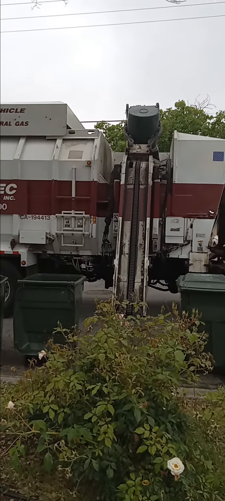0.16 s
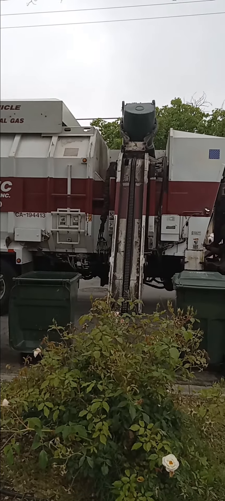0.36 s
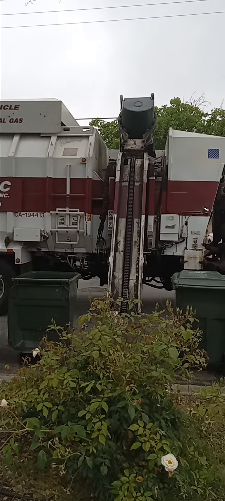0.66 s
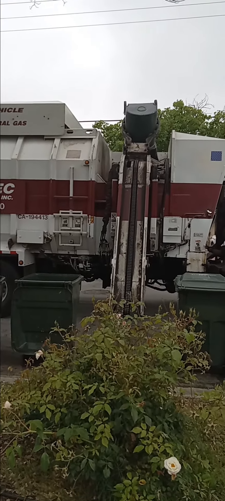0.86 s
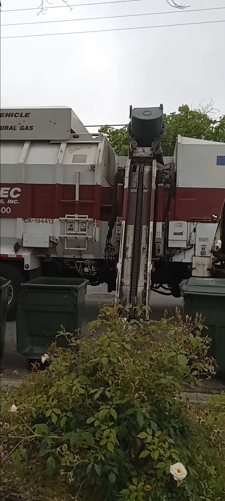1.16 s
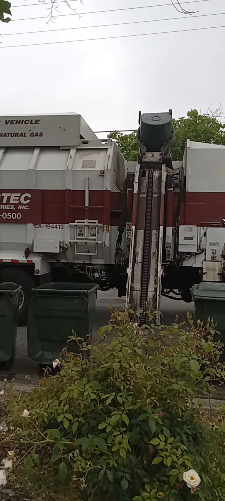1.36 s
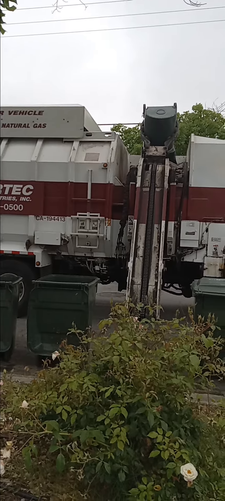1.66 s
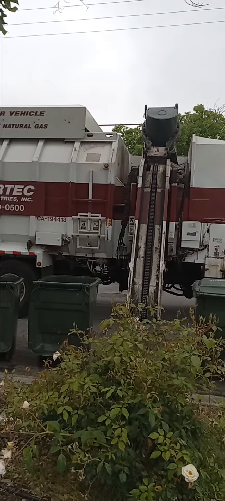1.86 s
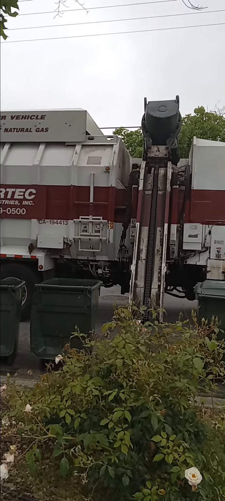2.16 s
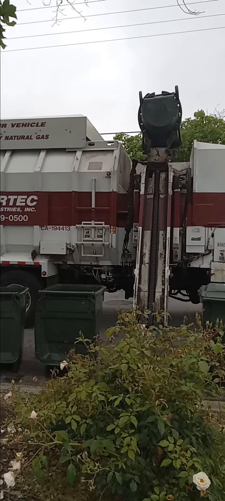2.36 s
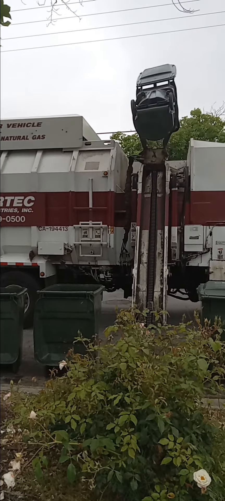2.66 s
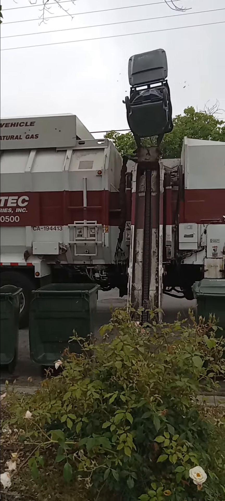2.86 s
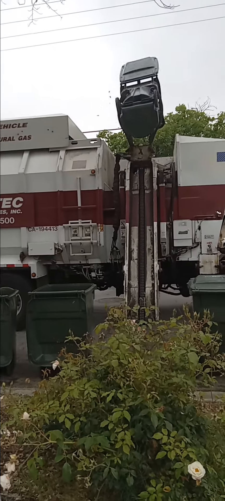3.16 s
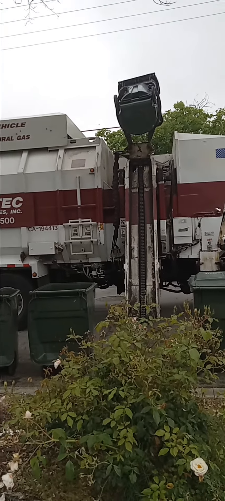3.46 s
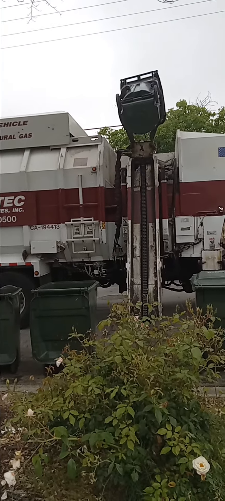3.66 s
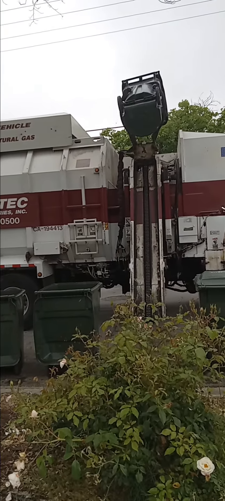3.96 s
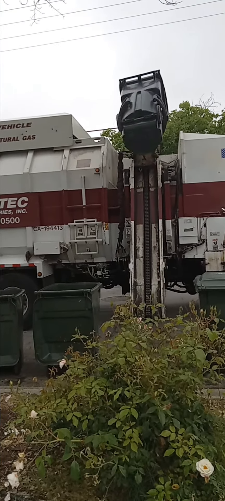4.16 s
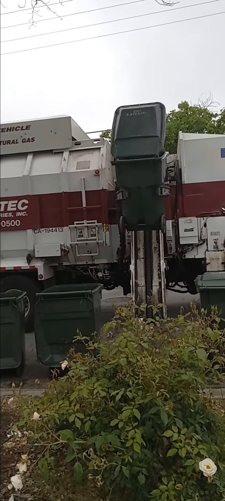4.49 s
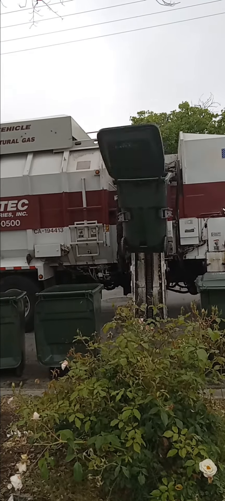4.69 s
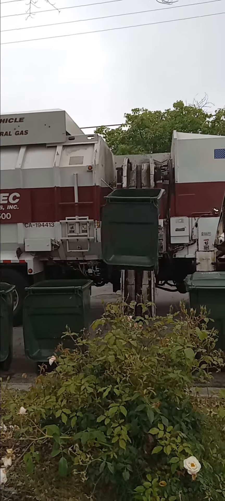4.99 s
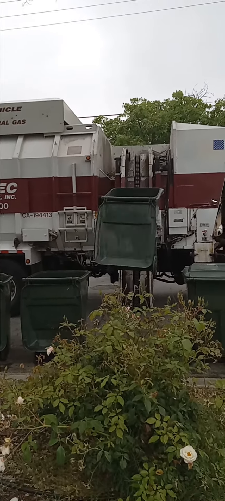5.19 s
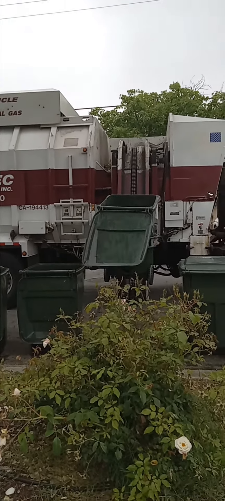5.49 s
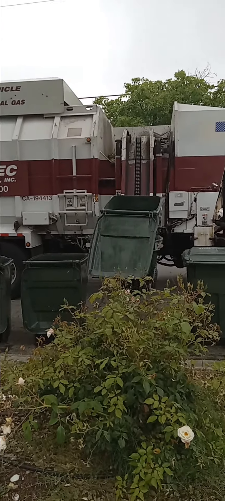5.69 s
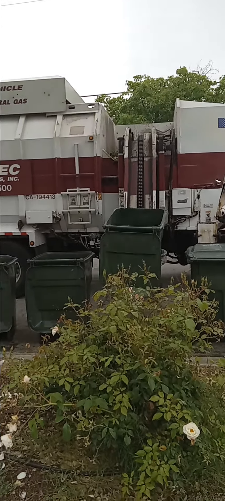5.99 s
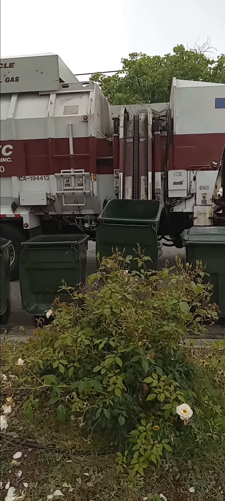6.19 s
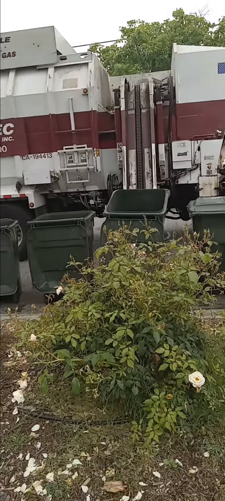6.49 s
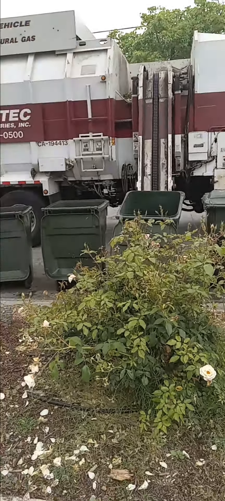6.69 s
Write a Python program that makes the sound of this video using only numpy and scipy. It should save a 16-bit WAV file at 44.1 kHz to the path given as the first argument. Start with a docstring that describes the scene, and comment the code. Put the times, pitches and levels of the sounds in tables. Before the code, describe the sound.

A phone captures a garbage truck working across a planted verge. Quiet engine hum and light metal rattle come first, with small squeaks, then loud loose steel crashes and hollow plastic thuds in several bouts. After a short throbbing groan and a bang, an even run of bright metallic clicks follows the cart down, ending in low double thumps and a last small rattle.

```python
"""Roadside, across a verge: a refuse truck idles while its steel arm shakes a plastic cart over the hopper.
Steel blows and rattle are noise and small pings through ringing modes; dry joints squeak as rough tones.
Cart and hopper drum, ring and boom through lower modes; a groaning lid is a gliding, throbbing tone.
Then a chain lowers the cart down a rail, each link a short ring and tick, and the cart thumps on the road.
A phone microphone listens, with a bright peak near its band limit in the fizz and the link ticks."""
import sys
import numpy as np
from scipy import signal
from scipy.fft import rfft, irfft, next_fast_len
from scipy.io import wavfile
from scipy.ndimage import uniform_filter1d, map_coordinates

SR = 44100
rng = np.random.default_rng(int(sys.argv[2]) if len(sys.argv) > 2 else 0)


def pcm_store(signal):
    """Save signal as 16-bit PCM."""
    levels = np.round(np.clip(np.atleast_2d(signal), -1, 1) * 32767)
    wavfile.write(sys.argv[1], SR, levels.astype(np.int16).T)


N = 301688
GRID_S = np.arange(0, N / SR, .001)  # control times, one a millisecond


def amp(db):
    """Decibels to gain."""
    return 10 ** (np.asarray(db) / 20)


def decibels(power):
    """Power to dB."""
    return 10 * np.log10(power)


def unit(x):
    """x at rms 1."""
    return x / np.sqrt(np.mean(x ** 2) + 1e-20)


def add_at(out, start_s, sound):
    """Mix a sound into out from its start time."""
    out[round(start_s * SR):][:len(sound)] += sound


def curves(rows):
    """One value per sample for each column after the time."""
    s, *columns = np.transpose(rows)
    return [np.interp(np.arange(N) / SR, s, column) for column in columns]


def wobble(rate):
    """A smooth random curve, rate knots a second."""
    knots = rng.standard_normal(int(N * rate / SR) + 4)
    return map_coordinates(knots, [np.arange(N) * rate / SR])


def filtered(x, response):
    """x shaped by a response of frequency."""
    m = next_fast_len(N + SR // 2)
    spectrum = rfft(x, m) * response(np.fft.rfftfreq(m, 1 / SR))
    return irfft(spectrum, m)[..., :N]


def colour(points):
    """Gain of (f/Hz, level/dB) points joined on a log frequency axis."""
    f, db = np.transpose(points)
    return lambda hz: amp(np.interp(np.log(hz + 1), np.log(f + 1), db))


def resonant(modes):
    """Causal response of (f/Hz, width/Hz, level/dB) modes, with alternating signs."""
    def response(f):
        return sum((-1) ** k * amp(db) * 1j * f * width / (hz * hz - f * f + 1j * f * width)
                   for k, (hz, width, db) in enumerate(modes))
    return response


def patchy(patchy_db):
    """White noise with patches of random gain in time and frequency."""
    z = signal.stft(rng.standard_normal(N), nperseg=512)[2]
    field = uniform_filter1d(rng.standard_normal(z.shape), 6, 0)
    field = uniform_filter1d(field, 8, 1)
    return unit(signal.istft(z * amp(patchy_db * unit(field)), nperseg=512)[1][:N])


def jolts(rate, spread_db, t60):
    """Envelope of random small contacts: sudden rises of mixed size that die away."""
    kicks = (rng.random(N) < rate / SR) * amp(spread_db * rng.standard_normal(N))
    return signal.lfilter([1], [1, -amp(-60 / (t60 * SR))], kicks)


def wavering(hz, waver_hz, rate):
    """A tone of rms 1 whose pitch wanders at random."""
    return np.sqrt(2) * np.sin(2 * np.pi * np.cumsum(hz + waver_hz * wobble(rate)) / SR)


# steel blows: t/s, relative level/dB, strongest ring f/Hz, relative rim knock level/dB against the blow
STEEL_BLOWS = [(0.2364, -21, 2214, -16.5), (0.3177, -18, 2075, -34), (0.844, -22, 1854, -12.5),
               (1.7893, -13.5, 2142, -38.5), (1.8557, -13, 2135, -31.5), (1.935, -15.5, 2322, -33),
               (1.949, -8.5, 2089, -29.5), (2.0612, -9.5, 2112, -12.5), (2.106, -18, 2170, 7),
               (2.4418, -17, 2058, 2.5), (2.7304, -21.5, 2182, 0), (3.3755, -11.5, 2447, -5.5),
               (3.5864, -17, 2864, 2.5), (3.603, -12.5, 2099, -9), (4.0552, -7.5, 2156, -29.5),
               (4.1265, -13.5, 2276, 0.5), (4.215, -11, 2053, -30), (4.4044, -6.5, 1849, -17),
               (4.6728, -11.5, 2147, -31), (4.9418, -16.5, 2650, -12.5), (5.069, -18, 2750, -19.5),
               (5.175, -16.5, 1907, -30.5), (5.7982, -23, 1986, -3), (6.012, -19.5, 2263, -13),
               (6.511, -21.5, 5960, -7), (6.5413, -19, 2203, -31), (6.702, -18.5, 2094, -4.5),
               (6.769, -15.5, 5550, -15.5), (6.771, -11.5, 2201, -30.5), (6.792, -21, 3050, -30)]
# modes of the steel arm, rung by blows and rattle: f/Hz, width/Hz, relative level/dB
ARM_MODES = [(1336.4, 20.4, -6.5), (1802, 55, -3), (1937.7, 150, 1), (2092, 139, 3.5), (2169.3, 40.3, 8.5),
             (2346, 75, -0.5), (2771, 70, -2), (3489, 400, -7.5), (4626, 168, -4.5), (6090, 954, -6.5)]
# modes of the cart's stiff rim, knocked by blows and drumming: f/Hz, width/Hz, relative level/dB
RIM_MODES = [(781.8, 163, -1.5), (1008.5, 330, -4.5), (1350.7, 90, -1)]
RING_T60_S = 0.0872


def clanks():
    """Each blow cracks (hard ones more), rings one mode roughly, knocks the rim and chatters through the arm."""
    chatter, crack, knock, ring = np.zeros((4, N + SR))
    t = np.arange(SR // 3) / SR
    for s, db, hz, knock_db in STEEL_BLOWS:
        shape = amp(db - 60 * t / 0.1356) * (1 - np.exp(-t / 0.00064))
        click = 1 + 0.89 * amp(-60 * t / 0.0022)
        add_at(chatter, s, shape * click * rng.standard_normal(len(t)))
        crack_gain = amp(0.366 * (db + 7.5) - 60 * t / 0.207)  # shortens the shape
        add_at(crack, s, crack_gain * shape * rng.standard_normal(len(t)))
        knock_gain = amp(knock_db + 60 * t / 0.196)  # lengthens the shape
        add_at(knock, s, knock_gain * shape * rng.standard_normal(len(t)))
        wander = np.cumsum(rng.standard_normal(len(t))) * 0.079
        add_at(ring, s, amp(db - 10 - 60 * t / RING_T60_S) * np.sin(2 * np.pi * hz * t + wander))
    arm = lambda hz: resonant(ARM_MODES)(hz) / (1 + 1j * hz / 7000) ** 4
    broad = lambda hz: resonant([(3800, 5000, 0)])(hz) / (1 + 1j * hz / 7500) ** 4
    chatter = amp(0.5) * filtered(chatter[:N], arm)
    crack = amp(-5.5) * filtered(crack[:N], broad)
    knock = amp(5.5) * filtered(knock[:N], resonant(RIM_MODES))
    return chatter + crack + knock + ring[:N]


def pings(count):
    """Small parts strike at random moments, each ringing one pitch for some milliseconds."""
    at, pitch, size, life = rng.random((count, 4)).T
    t = np.arange(SR // 60) / SR
    hz = 700 * (7000 / 700) ** pitch
    size_db = np.minimum(-3.5 * np.log(1 - size), 10)  # a few strike much harder
    gain = amp(size_db - 2.5 * np.log2(hz / 2600) ** 2)
    fade = amp(-60 * t / (0.01 + 0.05 * life[:, None] ** 2))
    waves = gain[:, None] * fade * np.sin(2 * np.pi * hz[:, None] * t)
    where = (at * N).astype(int)[:, None] + np.arange(len(t))
    return unit(np.bincount(where.ravel(), waves.ravel(), N + len(t))[:N])


# broad colour of the rattling steel, also used by the link ticks: f/Hz, relative level per Hz/dB
STEEL_COLOUR = [(350, -8), (600, -9.5), (833, -6), (1250, -2), (1310, -1.5), (1650, -8.5), (2060, 4.5),
                (2960, -10.5), (5340, -11), (9000, -24.5), (11700, -55.5), (19800, -120)]


def rattle(level_db):
    """Loose steel chatters, broad and through the arm; contacts and pings stand out more the harder it shakes."""
    loose = np.clip((level_db + 41) / 12, 0, 1)
    contacts = 1 + 0.65 * loose * jolts(rate=80, spread_db=4, t60=0.04)
    broad = unit(filtered(patchy(patchy_db=4.0), colour(STEEL_COLOUR)))
    shaken = filtered(patchy(patchy_db=2.5), lambda hz: 1 / (1 + (hz / 7000) ** 6))
    rung = np.zeros(N)
    for k, mode in enumerate(ARM_MODES):
        come_and_go = amp((0.5 + 2.77 * loose) * wobble(14))
        rung += (-1) ** k * come_and_go * filtered(shaken, resonant([mode]))
    parts = loose * amp(level_db - 8.5) * pings(count=6000)
    return parts + contacts * (amp(level_db - 7.0) * broad + amp(level_db - 12.0) * unit(rung))


def dulled(x, bright_db):
    """Soft contacts excite less of the upper steel: the part above the 3.6 kHz knee follows the brightness."""
    upper = filtered(x, lambda hz: 1 / (1 + (3600 / (hz + 1)) ** 6))
    upper_gain = amp(0.561 * np.clip(bright_db + 19.0, -40, 5))
    return x + (upper_gain - 1) * upper


# treble as the microphone hears it, also in the link ticks: f/Hz, relative level per Hz/dB
AIR_COLOUR = [(6000, -120), (7000, -20), (9000, -1), (12500, -30), (14200, -11.5), (15500, -5.5)]


def fizz(level_db, bright_db):
    """Grit and tiny contacts give the rattle its treble: patchy noise under a jolting envelope."""
    grit = 0.5 + 0.81 * jolts(rate=37, spread_db=6.5, t60=0.0493)
    treble = unit(filtered(patchy(patchy_db=4.0), colour(AIR_COLOUR)))
    return amp(level_db + bright_db - 4.5) * grit * treble


# bursts of a loose clamp: start t/s, length t/s, starting level/dB, relative level of the upper modes/dB
CLAMP_BURSTS = [(4.83, 0.121, -36.5, -3), (4.944, 0.056, -31.5, -4.5), (5.064, 0.0904, -29, -2.5),
                (5.171, 0.06, -32, -1)]
# modes of the clamp: f/Hz, width/Hz, relative level/dB
CLAMP_MODES = [(1328.4, 80, 2.5), (2756, 88, -2.5), (3508, 97, -9), (4745, 69, 3.5), (6170, 142, -5.5)]


def jangle():
    """The clamp buzzes against its seat: unevenly swelling noise rings its lower and upper modes in bursts."""
    t = np.arange(N) / SR
    buzz = amp(2.72 * wobble(90)) * rng.standard_normal(N)
    rung = filtered(buzz, resonant(CLAMP_MODES))
    rung = unit(filtered(rung, resonant([(hz, 3 * width, 0) for hz, width, _ in CLAMP_MODES])))
    upper = filtered(rung, lambda hz: hz > 4000)
    out = np.zeros(N)
    for s, long, db, upper_db in CLAMP_BURSTS:
        edges = np.clip(np.minimum((t - s) / 0.0017, (s + long - t) / 0.0336), 0, 1)
        burst = amp(db - 8 * (t - s).clip(0, 1) / long) * edges
        out += burst * (rung + (amp(upper_db) - 1) * upper)
    return out


def swells(notes, smear):
    """Rough tones that swell and stop; smear spreads the pitch."""
    out, rough = np.zeros(N + SR), wobble(200)
    for s, long, hz, db in notes:
        t = np.arange(round(long * SR) + 2) / SR
        swell = np.sin(np.pi * (t / t[-1]) ** 1.4) ** 0.208
        drift = np.cumsum(rough[round(s * SR):][:len(t)]) / SR
        add_at(out, s, amp(db + 8.5) * swell * np.sin(2 * np.pi * hz * (t + smear * drift)))
    return out[:N] * amp(3.5 * wobble(45))


# squeaking joints: start t/s, length t/s, f/Hz, relative level/dB
JOINT_SQUEAKS = [(.15, .1, 1870, -47), (.3, .29, 1930, -50), (.95, .1, 3650, -57), (.93, .06, 5200, -59),
                 (.93, .06, 2700, -57), (1.04, .05, 5750, -60), (1.16, .12, 1375, -48),
                 (1.11, .16, 3300, -57), (1.17, .16, 4450, -57), (1.2, .06, 4850, -59),
                 (1.2, .09, 3700, -59), (1.23, .07, 5950, -60), (1.6, .13, 1925, -44)]
# single hollow notes of the cart: start t/s, length t/s, f/Hz, relative level/dB
CART_HOOTS = [(.05, 0.13, 143.8, -40.5), (1.08, 0.0798, 236.5, -48.5)]


def squeaks():
    """Stick-slip in dry joints, and the cart's hollow notes, both as rough swelling tones."""
    return swells(JOINT_SQUEAKS, smear=0.017) + swells(CART_HOOTS, smear=0.047)


# modes of the cart wall: f/Hz, width/Hz, relative level/dB
CART_MODES = [(187.8, 60.6, -4.5), (240.9, 25.5, -1), (263, 26.6, -2), (338.7, 44.4, -4.5),
              (400.1, 70.1, 2), (488.5, 103.6, 1), (569.9, 98.8, -3)]
# modes of the hopper: f/Hz, width/Hz, relative level/dB
HOPPER_MODES = [(59.8, 29, -8.5), (86.35, 28, -4), (142.1, 22.05, -6.5)]


def drumming(wall_db, wall_hz, boom_db):
    """Refuse and clamps beat the cart wall, one pitch leading, and knock its rim; the hopper booms under it."""
    beats = 0.8 + jolts(rate=50, spread_db=3.0, t60=0.04)

    def beaten(modes):
        """Jolting noise rung twice by the same modes."""
        return unit(filtered(beats * rng.standard_normal(N), lambda hz: resonant(modes)(hz) ** 2))

    upper = np.clip((wall_hz - 200) / 220, 0, 1)  # small panels lead when the pitch is high
    panels = np.sqrt(1 - upper) * beaten(CART_MODES[:4]) + np.sqrt(upper) * beaten(CART_MODES[3:])
    leading = amp(-9.5 + 3.33 * wobble(35)) * wavering(wall_hz, waver_hz=12.606, rate=40)
    wall = amp(-2) * panels + leading + amp(-12.5) * beaten(RIM_MODES)
    hum = amp(1.6 * wobble(18)) * wavering(92, waver_hz=10, rate=20)
    boom = amp(-6.5) * hum + amp(-5.0) * beaten(HOPPER_MODES)
    return amp(wall_db) * wall + amp(boom_db) * boom


# hollow knocks, one panel of the cart ringing clear: t/s, f/Hz, level/dB
PANEL_KNOCKS = [(2.116, 882.4, -20), (2.736, 467, -23), (2.736, 718.2, -32), (3.3755, 1022, -17),
                (3.394, 340, -19), (3.488, 2030, -24), (3.506, 1130, -26), (3.587, 450.7, -24),
                (4.73, 447.6, -16), (4.748, 450.1, -11), (5.803, 638.3, -30), (6.384, 1760, -20),
                (6.391, 303.9, -12.5), (6.428, 1770, -25), (6.446, 260, -15), (6.569, 202.5, -13.5),
                (6.576, 1740, -23), (6.592, 350.8, -19.5)]
KNOCK_T60_S = 0.1056


def knocks():
    """Each knock rings one panel, its pitch a little unsteady."""
    out, t = np.zeros(N + SR), np.arange(SR // 3) / SR
    for s, hz, db in PANEL_KNOCKS:
        wander = 3e-5 * hz * np.cumsum(rng.standard_normal(len(t)))
        shape = amp(db - 60 * t / KNOCK_T60_S) * (1 - np.exp(-t / 0.002))
        add_at(out, s, shape * np.sin(2 * np.pi * hz * t + wander))
    return out[:N]


# slams of the empty cart: t/s, level/dB
CART_SLAMS = [(2.732, -37.5), (3.377, -24.5), (3.465, -29.5), (6.384, -25), (6.575, -30), (6.592, -27)]
# modes of its shell: f/Hz, relative level/dB, t60/s
SHELL_MODES = [(614.2, -9, 0.265), (858.6, -14.5, 0.203), (1138, -14, 0.29), (1252.6, -12, 0.22),
               (1768, -2.5, 0.203), (1967, -8, 0.173), (2368, -13.5, 0.16), (3010, -17, 0.117),
               (3320, -16, 0.25), (6840, -22.5, 0.118)]
MAX_BEAT_HZ = 35  # furthest each of a pair lies from the mode's pitch


def slams():
    """Every slam rings the empty cart's shell modes afresh, roughly, each a close pair that beats."""
    out, t = np.zeros(N + SR), np.arange(SR // 3) / SR
    onset = 1 - np.exp(-t / 0.00098)
    for s, db in CART_SLAMS:
        for hz, mode_db, t60 in SHELL_MODES:
            wander = .045 * np.cumsum(rng.standard_normal(len(t)))
            fade = amp(db + mode_db + 2 * rng.normal() - 60 * t / t60)
            beat = np.cos(2 * np.pi * MAX_BEAT_HZ * rng.random() * t)
            add_at(out, s, onset * fade * beat * np.sin(2 * np.pi * hz * t + wander))
    return out[:N]


# the cart's lid groaning as it swings: t/s, f/Hz, level/dB before the throb
LID_GROAN = [(4.47, 312.2, -30), (4.502, 291.2, -26.5), (4.593, 261.5, -28.5), (4.738, 246.5, -32.5),
             (4.8, 254, -46)]


def groan():
    """A mostly falling tone, throbbing 21 times a second, while the lid swings."""
    hz, db = curves(LID_GROAN)
    t = np.arange(N) / SR
    on = np.clip(np.minimum(t - LID_GROAN[0][0], LID_GROAN[-1][0] - t) / 0.0135, 0, 1)
    throb_db = 5.03 * np.cos(2 * np.pi * 21 * (t - 4.51))
    return on * amp(db + throb_db) * wavering(hz, waver_hz=2.36, rate=25)


# links that seat hard on the sprocket: t/s, relative ring level/dB
HARD_SEATS = [(5.339, -25.5), (5.407, -21.5), (5.4462, -24.5), (5.517, -19.5), (5.586, -30),
              (5.6538, -23.5), (5.726, -22.5), (5.799, -29), (5.904, -30.5), (6.0115, -23), (6.0838, -21),
              (6.1216, -26.5), (6.228, -26)]
FIRST_LINK_S, LINKS_PER_S, LINK_COUNT = 5.2325, 28.2, 32
LINK_DB, LINK_SPREAD_DB = -33, 2.5


def links():
    """The chain runs evenly; a hard link takes the place of the nearest even one."""
    s = FIRST_LINK_S + np.arange(LINK_COUNT) / LINKS_PER_S
    db = LINK_DB + LINK_SPREAD_DB * rng.standard_normal(LINK_COUNT)
    hard_s, hard_db = np.transpose(HARD_SEATS)
    nearest = np.round((hard_s - FIRST_LINK_S) * LINKS_PER_S).astype(int)
    s[nearest], db[nearest] = hard_s, hard_db
    return zip(s, db)


# modes of a chain link: f/Hz, mean relative level/dB, t60/s
LINK_MODES = [(4700.5, 1.5, 0.0582), (4960, -16.5, 0.028)]


def chain():
    """Every link rings roughly for a moment and gives a broad tick of its own strength."""
    ring, tick = np.zeros((2, N + SR))
    t = np.arange(SR // 8) / SR
    for s, db in links():
        wander = 0.014 * np.cumsum(rng.standard_normal(len(t)))  # in cycles
        rung = np.zeros(len(t))
        for hz, mode_db, t60 in LINK_MODES:
            fade = amp(mode_db + rng.normal(0, 1.69) - 60 * t / t60)
            rung += fade * np.sin(2 * np.pi * (hz * t + rng.random() + wander))
        add_at(ring, s, amp(db - 5) * rung * (1 - np.exp(-t / 0.00126)))
        tick_db = -36.5 + 0.4 * (db + 30) + rng.normal(0, 2)
        add_at(tick, s, amp(tick_db - 60 * t / 0.024) * rng.standard_normal(len(t)))

    def tick_colour(hz):
        """Treble plus the steel's colour with its bass cut."""
        steel = amp(14.0) * colour(STEEL_COLOUR)(hz) / (1 + (1500 / (hz + 1)) ** 4)
        return colour(AIR_COLOUR)(hz) + steel

    return ring[:N] + filtered(tick[:N], tick_colour)


# firing orders of the engine: f/Hz, mean level/dB before it sinks
FIRING_ORDERS = [(78, -52.5), (147, -51.5)]
# colour of engine and pump noise: f/Hz, relative level per Hz/dB
ENGINE_COLOUR = [(18, -46.5), (30, 0.5), (149, -9.5), (174, -30.5), (294, -6), (698, -23), (883, -14),
                 (2590, -11), (3280, -72.5), (6150, -24), (15800, -60.5)]
ENGINE_NOISE_DB = -46  # mean, before it sinks


def engine(rattle_db):
    """Wavering low orders over the noise of engine and pump; all of it sinks under hard rattling."""
    orders = sum(amp(db + 1.31 * wobble(3.885)) * wavering(hz, waver_hz=2.828, rate=14)
                 for hz, db in FIRING_ORDERS)
    noise = unit(filtered(patchy(patchy_db=4.0), colour(ENGINE_COLOUR)))
    noise *= amp(ENGINE_NOISE_DB + 0.41 * wobble(2.85))
    sink = amp(-.8 * np.clip(rattle_db + 40.0, 0, 30))
    return sink * (orders + noise)


def bouts(s, rise, hold, fall, db):
    """Power of each bout on the control grid: rise, hold, fall, with slopes timed per 20 dB."""
    s, rise, hold, fall, db = [np.reshape(v, (-1, 1)) for v in (s, rise, hold, fall, db)]
    before = (s - GRID_S).clip(0) / np.abs(rise)
    after = (GRID_S - s - np.abs(hold)).clip(0) / np.abs(fall)
    return amp(2 * (db - 20 * (before + after).clip(0, 10)))


# the truck between shakes: t/s, rattle level/dB, treble level against rattle/dB, cart wall level/dB,
# hopper boom level/dB before its lumps and sinking
RESTING = [(0, -39.5, -24.5, -55.5, -57), (.8, -38.5, -26.5, -54.5, -55), (1.7, -38.5, -24, -55.5, -48.5),
           (2.85, -41, -21.5, -52, -57), (3.37, -42.5, -25, -54, -57.5), (4.04, -61, -37, -51, -47.5),
           (4.8, -47, -13.5, -50.5, -55), (5.13, -33.5, -19, -48.5, -39), (5.95, -37, -21.5, -47.5, -40.5),
           (6.37, -36, -10, -47, -44.5), (6.39, -36.5, -21, -42, -32.5), (6.7, -41, -43, -42, -35.5),
           (6.84, -34.5, -12.5, -51, -41)]
REST_WALL_HZ = 214.45
# bouts of shaking: t/s, rise per 20 dB/s, hold/s, rattle fall per 20 dB/s, rattle level/dB,
# treble level against rattle/dB; the sign of a time is ignored here and below
SHAKE_BOUTS = [(0.096, 0.079, 0.051, 0.105, -45, 2), (0.338, 0.0284, 0, 0.075, -29, -43),
               (0.947, 0.076, 0.035, 0.082, -37.5, -10), (1.029, 0.021, 0.296, 0.088, -54.5, 7.5),
               (1.786, 0.057, 0.185, 0.078, -31, -15), (1.97, 0.168, 0.027, 0.456, -29.5, -15),
               (2.062, 0.01492, 0.06, 0.06, -38.5, -9.5), (2.127, 0.0182, 0.12, 0.55, -25, -12.5),
               (2.453, 0.0615, 0.039, 0.137, -25.5, -20), (3.389, 0.0104, 0.022, 0.209, -23, -59),
               (3.605, 0.0095, 0, 0.084, -25.5, -7.5), (3.642, 0.056, 0.391, 0.0083, -27.5, -15.5),
               (4.055, 0.0062, 0.0671, 0.075, -29, -14), (4.15, 0.055, 0.085, 0.03, -22, -11),
               (4.246, 0.034, 0.4974, 0.0876, -25.5, -12.5), (4.851, 0.073, 0.139, 0.0767, -33.5, -20),
               (5.069, 0.025, 0.123, 0.203, -41.5, -9.5), (6.77, 0.078, 0, 0.06577, -33, -19.5)]
TREBLE_FADES = 4.87  # times faster than the rattle
# knocks on the cart wall: t/s, hold/s, fall per 20 dB/s, level/dB, leading f/Hz
WALL_THUDS = [(0.961, 0.1, 0.26, -46, 195.5), (1.794, 0.152, 0.444, -36, 290),
              (1.948, 0.064, 0.2253, -34.5, 338), (2.134, 0.024, 0.4323, -23.5, 300),
              (2.277, 0.034, 0.1976, -30.5, 347.6), (2.389, 0.0315, 0.13, -26.5, 223.2),
              (2.451, 0.0205, 0.1831, -28, 372.5), (2.519, 0.041, 0.15, -30.5, 229.7),
              (3.39, 0.0898, 0.61, -28.5, 269.8), (3.591, 0.0195, 0.58, -33, 434.8),
              (4.148, .03, 0.37, -25, 277), (4.238, 0.375, 0.4327, -34.5, 334.1),
              (4.77, 0.075, 0.2843, -26, 330.6), (4.89, 0.0328, 0.19, -34, 345.8),
              (5.801, 0.034, 0.64, -40, 337.5), (6.39, 0.0409, 0.32, -29, 221.8),
              (6.449, 0.0816, 0.42, -29, 208.8), (6.571, 0.0264, -0.04, -26.5, 190),
              (6.61, 0.0093, 0.24, -32, 192)]
# booms of the hopper: t/s, hold/s, fall per 20 dB/s, level/dB
HOPPER_BOOMS = [(0.038, 0.061, 1, -41), (0.986, 0.0713, 0.1241, -30), (2.156, 0.01045, 0.5, -30.5),
                (2.293, 0.0467, 0.46, -38.5), (2.528, 0.053, 0.63, -33.5), (2.759, 0.0216, 0.1661, -29),
                (3.438, 0.026, 0.42, -35), (3.646, 0.071, 0.5, -42), (3.884, 0.0811, 0.5, -42),
                (4.181, 0.243, -0.1, -29.5), (4.767, 0.092, 0.5, -25.5), (5.031, 0.0277, 0.4568, -31),
                (5.971, 0.058, -0.03, -30.5), (6.429, 0.082, 1.49, -19.5), (6.579, 0.0287, 0.35, -18),
                (6.717, 0.052, 0.25, -24)]
THUD_RISE_S, BOOM_RISE_S = 0.01533, 0.0226  # for the last 20 dB
BOOM_SINKS, SINKS_OVER_DB = 2.48, -37  # the resting boom loses dB per dB of rattle over this level


def controls():
    """Bouts add their power to the resting truck; yields rattle, brightness, wall, its pitch and boom."""
    to_grid = lambda curve: np.interp(GRID_S, np.arange(N) / SR, curve)
    rattle_db, treble_db, wall_db, boom_db = [to_grid(curve) for curve in curves(RESTING)]

    s, rise, hold, fall, db, treble_under_db = np.transpose(SHAKE_BOUTS)
    level_db = decibels(amp(2 * rattle_db) + bouts(s, rise, hold, fall, db).sum(0))
    treble = bouts(s, rise, hold, fall / TREBLE_FADES, db + treble_under_db).sum(0)
    bright_db = decibels(amp(2 * (rattle_db + treble_db)) + treble) - level_db

    s, hold, fall, db, hz = np.transpose(WALL_THUDS)
    thuds = bouts(s, THUD_RISE_S, hold, fall, db)
    resting = amp(2 * wall_db)
    wall = decibels(resting + thuds.sum(0))
    # squared power as weight, so the loudest knock leads
    wall_hz = (resting ** 2 * REST_WALL_HZ + hz @ thuds ** 2) / (resting ** 2 + (thuds ** 2).sum(0))

    s, hold, fall, db = np.transpose(HOPPER_BOOMS)
    lumps_db = 5 * to_grid(wobble(8.7))  # the resting boom comes in lumps
    sink_db = BOOM_SINKS * np.clip(level_db - SINKS_OVER_DB, 0, 30)
    boom = amp(2 * (boom_db + lumps_db - sink_db)) + bouts(s, BOOM_RISE_S, hold, fall, db).sum(0)
    return curves(np.transpose([GRID_S, level_db, bright_db, wall, wall_hz, decibels(boom)]))


def scene():
    """All sources reach the one microphone."""
    level_db, bright_db, wall_db, wall_hz, boom_db = controls()
    steel = dulled(clanks() + rattle(level_db), bright_db) + fizz(level_db, bright_db) + jangle()
    cart = drumming(wall_db, wall_hz, boom_db) + knocks() + slams() + groan()
    return (steel + squeaks() + cart + chain() + engine(level_db))[None]


TOP_HZ = 15870  # band limit


def record(dry):
    """The phone rounds off the highest peaks, cuts the deepest bass and keeps nothing above its band limit."""
    soft = dry / (1 + np.abs(dry / .6) ** 4) ** (1 / 4)
    return filtered(soft, lambda hz: (hz < TOP_HZ) / (1 + (38 / (hz + 1)) ** 4))


dry = scene()
out = record(dry)
pcm_store(out)
```